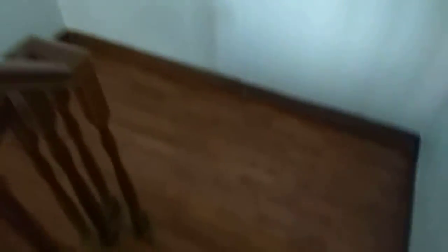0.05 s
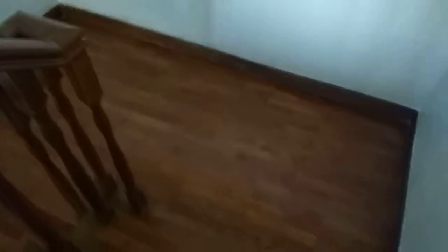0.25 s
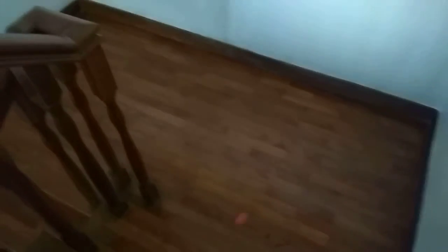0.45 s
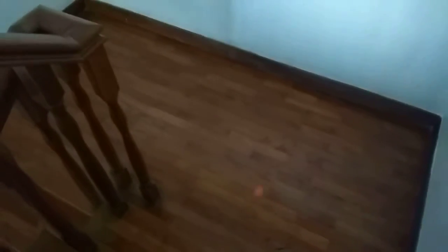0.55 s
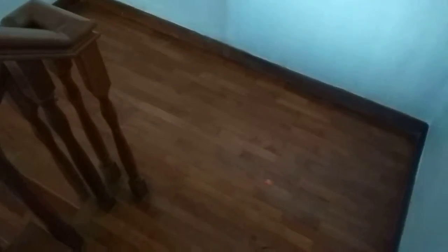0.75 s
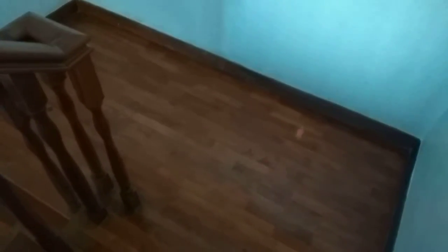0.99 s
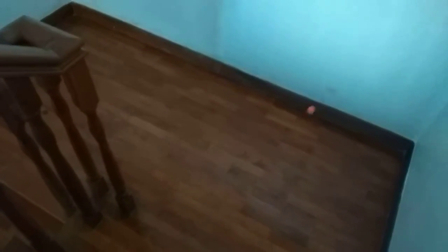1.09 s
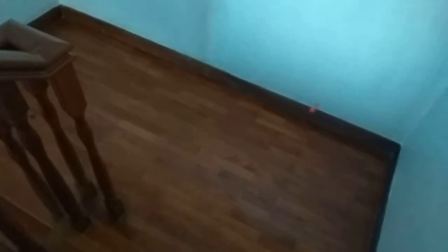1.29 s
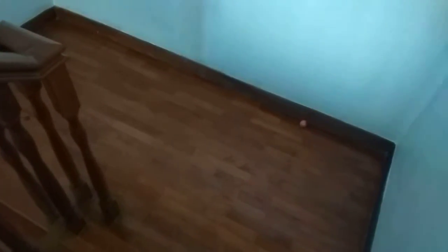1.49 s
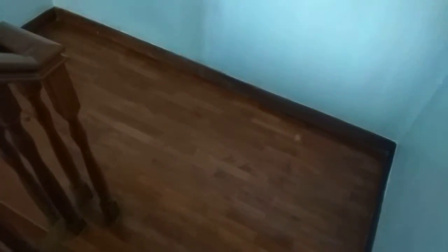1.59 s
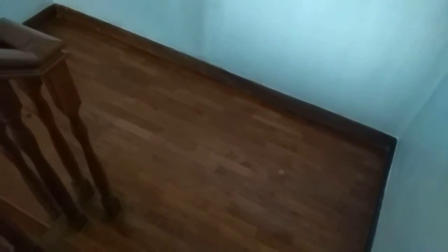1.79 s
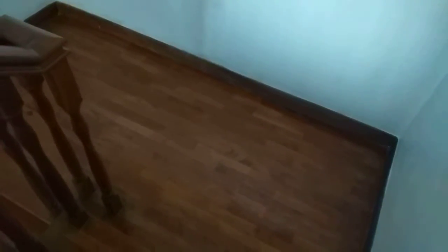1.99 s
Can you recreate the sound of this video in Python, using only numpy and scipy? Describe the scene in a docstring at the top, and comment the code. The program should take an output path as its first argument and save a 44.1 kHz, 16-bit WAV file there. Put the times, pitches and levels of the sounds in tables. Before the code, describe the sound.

A small hard ball bounces with hollow knocks and thin ticks in an echoing wooden stairwell.

```python
"""A small hard ball bounces down a wooden stair and across a landing, in a bare stairwell.
Room noise and a low rumble run throughout, and at first an earlier blow is still ringing.
A hollow knock of the stair comes with a thin, high tick of the ball at 0.15 s; more ticks follow.
A second knock and a tick come at 1.45 s, and a last tick at 1.83 s. Soft wavering tones come and go.
Knocks are dying sines, ticks are tiny puffs of noise, and echoes are fading noise and standing waves."""
import sys
import numpy as np
from scipy import signal
from scipy.fft import rfft, irfft
from scipy.io import wavfile
from scipy.ndimage import uniform_filter1d

SR = 44100
rng = np.random.default_rng(int(sys.argv[2]) if len(sys.argv) > 2 else 0)


def store_wav(level_fs):
    """Save 16-bit WAV to argv[1]."""
    pcm = np.round(np.clip(np.atleast_2d(level_fs), -1, 1) * 32767)
    wavfile.write(sys.argv[1], SR, pcm.T.astype(np.int16))


N = 90404  # length in samples
LEAD = 8820  # samples kept ahead of the start, so that earlier sounds can ring in
PORT_LAG = 11  # samples by which direct sound is late at the left microphone port
BODY_LEFT_DB = -1.5  # boards and standing waves are weaker at the left port


def amp(db):
    """Turns decibels into a plain factor."""
    return 10 ** (np.asarray(db) / 20)


def evened(x):
    """Scales a signal to an average (RMS) strength of 1."""
    return x / np.sqrt(np.mean(x ** 2) + 1e-20)


def read(points, hz):
    """Reads a curve between its points, on a logarithmic pitch scale."""
    point_hz, value = np.transpose(points)
    return np.interp(np.log(hz + 1), np.log(point_hz + 1), value)


def add(mix, start_s, sound):
    """Mixes a sound in at its start time; the mix begins LEAD samples early."""
    part = mix[..., LEAD + round(start_s * SR):][..., :sound.shape[-1]]
    part += sound[..., :part.shape[-1]]


def resonate(x, hz, width_hz):
    """One resonance of gain 1, fixed or gliding: shift its pitch to zero, smooth, shift back."""
    turn = np.exp(2j * np.pi * np.cumsum(hz * np.ones(len(x))) / SR)
    keep = np.exp(-np.pi * width_hz / SR)
    smooth = signal.lfilter([1 - keep], [1, -keep], x / turn)
    return 2 * (turn * smooth).real


def stereo_noise(length, size, shape):
    """Noise at the two ports, with strength shape(hz, t) and a likeness that depends on pitch."""
    # Each row: pitch in Hz, likeness of the two ports (1 = identical, negative = opposed)
    likeness = [(30, .97), (60, .98), (125, .975), (250, 0.94), (550, 0.7), (700, 0.63), (1000, -0.1),
                (4000, -0.07), (14000, .0)]
    # Each row: pitch in Hz, left minus right level in dB
    balance = [(60, -1.1), (180, 0.37), (550, 1.7), (1000, 1.4), (1650, 2.4), (4970, 1.5), (15000, 0.56)]
    hop = size // 4
    frames = 4 * length // size + 5
    hz = np.fft.rfftfreq(size, 1 / SR)[:, None]
    a, b, c, d = rng.standard_normal((frames, len(hz), 4)).T
    same = np.clip(read(likeness, hz), -1, 1)
    left = a + 1j * b
    right = same * left + np.sqrt(1 - same ** 2) * (c + 1j * d)
    tilt_db = read(balance, hz)
    spectrum = np.array([left, right]) * shape(hz, np.arange(frames) * size / 4 / SR)
    spectrum *= amp(np.array([tilt_db, -tilt_db]) / 2)
    return signal.istft(spectrum, nperseg=size, noverlap=size - hop)[1][:, :length]


def air():
    """Steady room noise with patches that drift over time and pitch."""
    # Each row: pitch in Hz, relative level in dB per Hz
    colour = [(45, -19.5), (60, -9), (80, -5), (115, -14.5), (147, -6.5), (180, -21), (245, -10),
              (300, -25.5), (337, -15), (380, -22.5), (540, -25.5), (650, -22), (1000, -27.5), (1600, -38),
              (3200, -43.5), (5000, -45.5), (7000, -51), (11500, -47.5), (13500, -54.5), (16000, -69)]
    level_db, patch_db = -53, 2.7
    patches = rng.standard_normal((4 * N // 2048 + 5, 1025)).T
    patches = uniform_filter1d(patches, 14, 0)  # smooth over pitch
    patches = evened(uniform_filter1d(patches, 6, 1))  # smooth over time

    def shape(hz, t):
        return amp(read(colour, hz) + patch_db * patches) * (hz > 40)

    return amp(level_db) * evened(stereo_noise(N, 2048, shape))


def rumble():
    """A deep, lumpy hum: noise through three equal resonances, nearly alike at both ports."""
    # Each row: time in seconds, level in dB
    levels = [(0.0, -56), (0.06, -47), (0.11, -57), (0.37, -53), (0.46, -56.5), (0.98, -52), (1.06, -60.5),
              (1.13, -49.5), (1.37, -48.5), (1.87, -56.5), (2.001, -50), (2.05, -64)]
    pitch_hz, width_hz = 26, 16  # of each resonance
    hum = rng.standard_normal((2, N + SR))
    for _ in range(3):
        hum = np.array([resonate(x, pitch_hz, width_hz) for x in hum])
    loudness = np.sqrt(uniform_filter1d(hum[0] ** 2, 6000) + 1e-12)
    difference = 0.069 * hum[1] * np.array([[1], [-1]])
    hum = (hum[0] + difference) / loudness
    time_s, db = np.transpose(levels)
    return amp(np.interp(np.arange(N) / SR, time_s, db)) * hum[:, SR:]


def tones():
    """Narrow noise that swells fast, holds and fades; its flutter is partly evened out."""
    # Each row: start in seconds, length in seconds, first pitch in Hz, last pitch in Hz,
    # width in Hz of each of two resonances, level in dB before the swell and fade
    glides = [(-.15, .33, 338, 321, 27, -54.5), (.34, 0.45, 1708, 1676, 17, -80),
              (1.647, 0.25, 358, 335, 30, -51.5), (1.65, 0.092, 789, 858, 25, -66),
              (1.67, 0.15, 2300, 2500, 600, -75.5), (1.403, 0.064, 3620, 3550, 90, -81)]
    steadiness = 0.4  # 0 leaves the flutter, 1 divides it out
    out = np.zeros(N + LEAD)
    for start_s, length_s, hz, end_hz, width_hz, db in glides:
        progress = np.arange(0, length_s, 1 / SR) / length_s
        count = len(progress)
        # the resonances settle at the first pitch, then glide
        glide = np.interp(np.arange(SR), [SR - count, SR], [hz, end_hz])
        tone = resonate(rng.standard_normal(SR), glide, width_hz)
        tone = resonate(tone, glide, width_hz)
        power = uniform_filter1d(tone ** 2, 800) + 1e-12
        tone = evened((tone / power ** (steadiness / 2))[-count:])
        swell = np.sin(np.pi * progress ** 0.81) ** .5
        add(out, start_s, amp(db) * tone * swell)
    return out[LEAD:]


def ring(modes, seconds):
    """Sum of dying sines; t60 is the time a sine takes to fall by 60 dB."""
    t = np.arange(0, seconds, 1 / SR)
    return sum(amp(db - 60 * t / t60) * np.sin(2 * np.pi * hz * t) for hz, db, t60 in modes)


def blow(modes):
    """The boards give way, then ring; the ring builds over the contact."""
    rise_s = .001
    body = -ring(modes, 0.22)
    t = np.arange(len(body)) / SR
    return body * (1 - np.exp(-t / rise_s))


def burst(fade_s, hz, width_hz):
    """A short puff of noise around one pitch and a clean click of the same colour and energy."""
    t = np.arange(1000) / SR
    noise = rng.standard_normal(1000) * np.exp(-t / fade_s)
    impulse = 1. * (t == 0)
    puff, click = (resonate(resonate(x, hz, width_hz), hz, width_hz) for x in (noise, impulse))
    puff = puff / abs(puff).max()
    return np.array([puff, click * np.linalg.norm(puff) / np.linalg.norm(click)])


def walls(x):
    """Direct sound, a little late at the left port, and single reflections off the near walls."""
    # Each row: delay in seconds, level in dB, share at the left port, share at the right port
    # (a negative share flips the wave)
    reflections = [(.0045, -5, 1, -.3), (.0068, -8, .2, 1), (.013, -12, -1, .3), (.0205, -13, .3, 1),
                   (.027, -12, 1, .4)]
    taps = np.zeros((2, 2000))
    taps[[0, 1], [PORT_LAG, 0]] = 1
    for delay_s, db, left, right in reflections:
        taps[:, round(delay_s * SR)] += amp(db) * np.array([left, right])
    return signal.fftconvolve(x[None], taps, axes=1)


def stairwell(body, click):
    """Echo of one blow: fresh noise tails, each band dying at its own speed, plus standing waves.

    The ring of the boards builds its echo up more slowly than the sharp click does."""
    # Each row: pitch in Hz, t60 in seconds
    decay = [(100, 0.67), (300, 1.49), (550, 0.96), (1000, 1.04), (2500, 0.73), (6000, 0.89), (10000, 0.77),
             (13000, 0.38)]
    # Colour of the noise tail for the boards. Each row: pitch in Hz, relative level in dB
    body_colour = [(100, -7), (270, 3), (600, -2), (1200, 2), (3000, 4.5), (6000, -6.5)]
    # Colour of the click that drives the echo. Each row: pitch in Hz, level in dB
    click_colour = [(1200, 3), (3000, -2), (5000, -8), (8000, -19), (12000, -11), (15000, 3)]
    # Standing waves. Each row: pitch in Hz, relative level in dB, t60 in seconds
    standing = [(151.6, -27, 1.2), (264.2, -2, 1.66), (342, -7, 1.7), (425.8, -0.5, 1.3), (456, -7, 0.66),
                (504, -4.5, 1.24), (540.6, -4.5, 1.28), (539.6, -3.5, 0.85), (568, -12, 1.8)]
    standing_db = -51.5
    body_build_s, click_build_s = 0.022, .003
    drive_t60 = 0.021  # seconds; only the first moments of a blow drive the echo
    t = np.arange(SR) / SR

    def tail(colour):
        noise = stereo_noise(SR, 512, lambda hz, u: amp(read(colour, hz) - 60 * u / read(decay, hz)))
        return noise / np.linalg.norm(noise[0])

    waves = amp([[standing_db + BODY_LEFT_DB], [standing_db]]) * ring(standing, 1)
    body_tail = (tail(body_colour) + waves) * (1 - np.exp(-t / body_build_s))
    click_tail = tail([(1000, 0)]) * (1 - np.exp(-t / click_build_s))  # even colour
    drive = body * amp(-60 * t[:len(body)] / drive_t60)
    click_gain = amp(read(click_colour, np.fft.rfftfreq(2048, 1 / SR)))
    click = irfft(rfft(click, 2048) * click_gain)
    body_echo = signal.fftconvolve(drive[None], body_tail, axes=1)[:, :SR]
    click_echo = signal.fftconvolve(click[None], click_tail, axes=1)[:, :SR]
    return body_echo + click_echo


def ball():
    """Every blow sounds directly and through the stairwell; its sharp part also comes off the walls."""
    # What the struck boards ring with. Each row: pitch in Hz, relative level in dB, t60 in seconds
    stair_modes = [(164, -3.5, 0.033), (318, -1, 0.062), (452, -1.5, 0.12), (536.4, 2, 0.125),
                   (560.7, -2.5, 0.17), (617, -8.5, 0.064), (858, -10, 0.077), (1078, -13.5, 0.049),
                   (1368, -16, 0.036), (1569, -15, 0.022), (1825, -16.5, 0.0068), (2340, -21, 0.016)]
    skirting_modes = [(238, -2.5, 0.013), (402, 9.5, 0.014), (770, -3.5, 0.074), (1026, -8.5, 0.06),
                      (1123, -1, 0.022), (1373, -8, 0.013), (1796, -8, 0.013), (2190, -11, 0.0065),
                      (2880, -14, .006), (3670, -26, 0.0096)]
    # Each row: start in seconds, level in dB, crack level in dB above the knock level,
    # crack pitch in Hz, crack width in Hz (of each of two resonances), echo level in dB
    stair_knocks = [(0.1460, -26, -12, 3710, 5300, 5.5)]
    skirting_knocks = [(-.14, -34.5, 2, 4200, 4950, 0.5), (1.4535, -30, -11.5, 2450, 6700, 3)]
    # Each row: start in seconds, level in dB, pitch in Hz, width in Hz (of each of two
    # resonances), echo level in dB, level of the floor's thud in dB
    ball_ticks = [(-.06, -31.5, 10200, 4600, 5.5, -93), (0.1459, -43, 9800, 2490, 14, -91),
                  (0.425, -50, 12430, 1530, 11, -103.5), (0.9362, -48.5, 12900, 5030, 7, -39.5),
                  (1.455, -43.5, 10850, 3480, 12, -76), (1.8336, -47.5, 9900, 3700, 9.5, -45)]
    crack_fade_s, tick_fade_s = .004, .0022
    thud_hz, thud_t60 = 262, 0.057  # t60 in seconds
    hits = []
    for modes, knocks in ((stair_modes, stair_knocks), (skirting_modes, skirting_knocks)):
        for start_s, db, crack_db, hz, width_hz, echo_db in knocks:
            body = amp(db) * blow(modes)
            crack = amp(db + crack_db) * burst(crack_fade_s, hz, width_hz)
            hits.append((start_s, body, crack, echo_db))
    for start_s, db, hz, width_hz, echo_db, thud_db in ball_ticks:
        thud = blow([(thud_hz, thud_db, thud_t60)])
        tick = amp(db) * burst(tick_fade_s, hz, width_hz)
        hits.append((start_s, thud, tick, echo_db))
    out = np.zeros((2, N + LEAD))
    for start_s, body, (puff, click), echo_db in hits:
        add(out, start_s, np.array([amp(BODY_LEFT_DB) * np.roll(body, PORT_LAG), body]))
        add(out, start_s, walls(puff))
        add(out, start_s, amp(echo_db) * stairwell(body, click))
    return out[:, LEAD:]


def scene():
    """Room noise, rumble, soft tones and the bouncing ball together."""
    return air() + rumble() + tones() + ball()


def record(dry):
    """A dip in the microphone's response, then the band limit."""
    dip_hz, dip_width_hz, dip_share = 690, 190, 0.69  # share taken away at the centre
    edge_hz = 15900
    dipped = np.array([x - dip_share * resonate(x, dip_hz, dip_width_hz) for x in dry])
    low_pass = signal.firwin(511, edge_hz, window=("kaiser", 9), fs=SR)
    return signal.oaconvolve(dipped, low_pass[None], "same")


dry = scene()
out = record(dry)
store_wav(out)
```